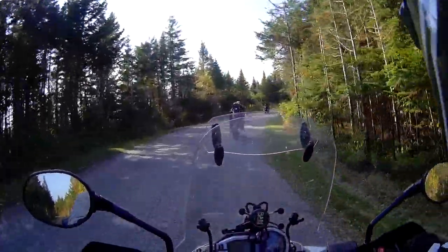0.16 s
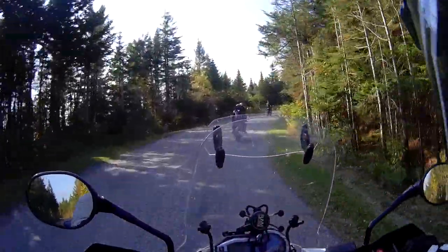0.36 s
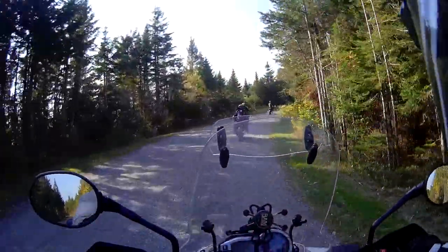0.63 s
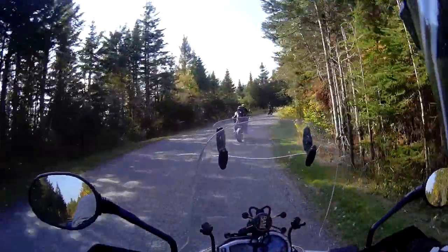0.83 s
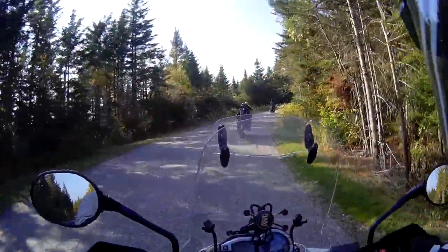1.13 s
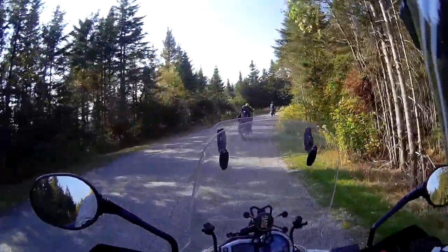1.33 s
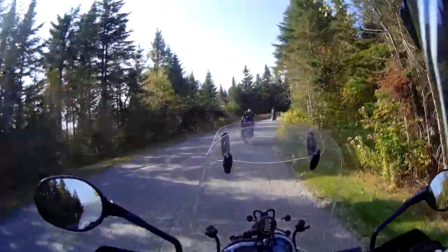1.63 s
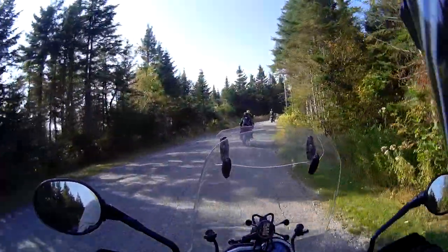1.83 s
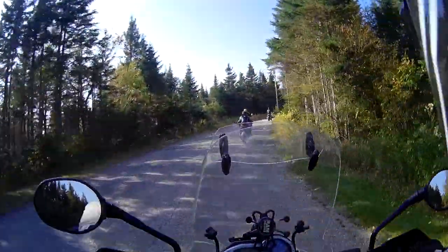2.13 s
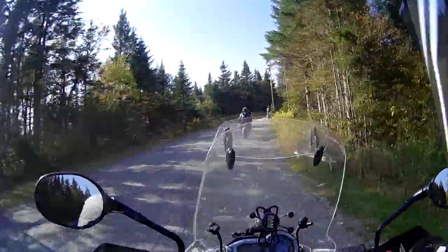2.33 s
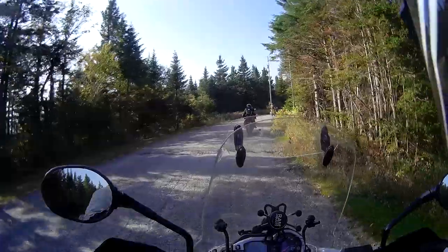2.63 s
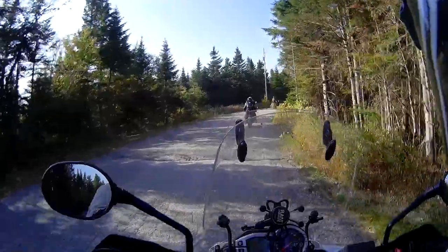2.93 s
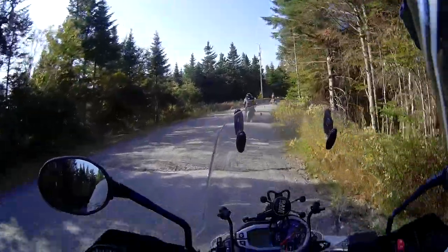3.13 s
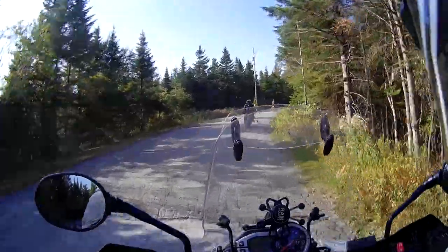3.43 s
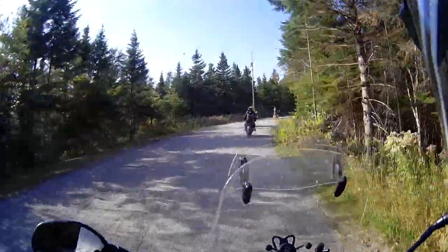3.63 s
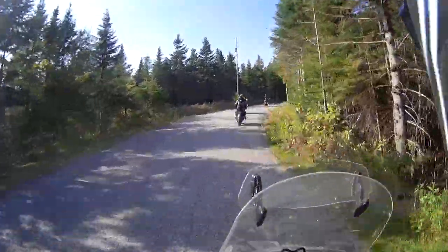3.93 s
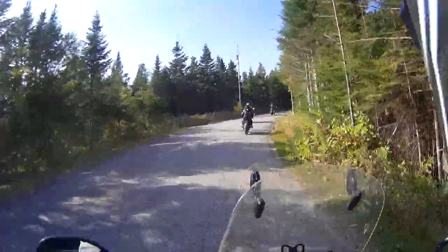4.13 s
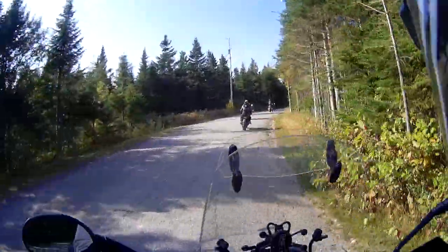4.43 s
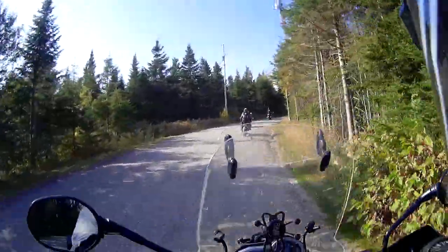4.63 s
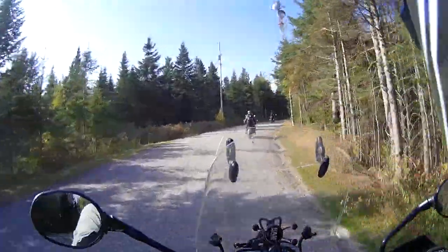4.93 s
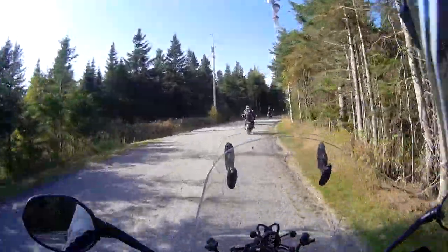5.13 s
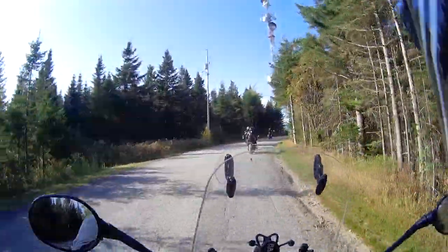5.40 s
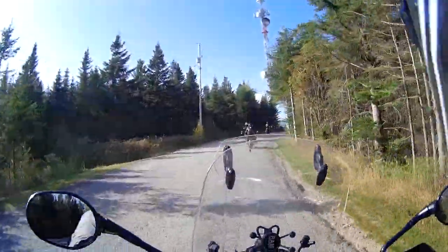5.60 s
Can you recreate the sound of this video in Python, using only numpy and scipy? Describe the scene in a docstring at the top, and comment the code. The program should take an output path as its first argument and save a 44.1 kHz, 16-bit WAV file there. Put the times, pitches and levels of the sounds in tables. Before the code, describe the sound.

A motorcycle travels along a forest road, heard from the rider's helmet. From the start there is a low exhaust hum with a thin, wavering gear whine, an intake growl and a light mechanical clatter, while a second motorcycle drones nearby at a slightly higher pitch. Road roar and airy hiss lie over both. At about 1.3 seconds all of this drops noticeably and stays lower, while wind keeps buffeting the microphone in irregular low gusts throughout. Three short, low thuds from bumps come at about 3.1, 3.5 and 4 seconds. Between 3.1 and 4.5 seconds the engine pitch rises a little, and from about 3.6 seconds a light, rapid valve tapping joins in. Brief high sizzles of air pass the helmet at around 3.7, 4 to 4.4 and 5.3 seconds. The engines run on steadily until nearly 6 seconds.

```python
"""A forest road, heard from the helmet of a rider on a three-cylinder motorcycle.
The exhaust hums, the primary gears whine and the cases clatter; a second engine drones nearby.
Road roar, intake growl and air hiss lie over them, and this whole bed sinks after the first second
while wind keeps buffeting the microphone. Past halfway, three bumps thud through the frame,
a valve taps under load, the head turns and air sizzles past an edge of the helmet."""
import sys
import numpy as np
from scipy import signal
from scipy.fft import rfft, irfft, next_fast_len
from scipy.io import wavfile
from scipy.ndimage import uniform_filter1d

SR = 44100
rng = np.random.default_rng(int(sys.argv[2]) if len(sys.argv) > 2 else 0)


def transcribe(u):
    """Save the signal u as a 16-bit wav file named by the first command-line argument.

    u: samples, shape (n,) or (channels, n), limited to [-1, 1]; the rate is SR.
    q: integer samples, one column per channel.
    """
    v = np.clip(np.atleast_2d(u).T, -1, 1)
    q = np.round(v * 32767).astype(np.int16)
    wavfile.write(sys.argv[1], SR, q)


N = 253998

# Fader for the bed; engine, road and hiss levels are relative to it: time_s, level_db
BED_FADER = [(0, -39), (1.23, -40), (1.28, -44), (1.42, -47), (1.48, -50.5), (1.72, -48.5), (1.91, -49.5),
             (1.97, -46), (2.2, -50), (2.52, -45.5), (2.72, -49.5), (2.9, -48.5), (3.03, -46),
             (3.33, -45.5), (3.41, -48), (3.48, -44.5), (3.72, -46), (3.87, -48.5), (4.0, -46),
             (4.07, -49.5), (4.12, -45.5), (4.42, -46), (4.52, -49), (4.75, -46), (4.92, -46.5),
             (5.12, -44), (5.5, -44.5), (5.57, -47.5), (5.76, -44.5)]
# The bike's engine speed: time_s, firing_hz
ENGINE_SPEED = [(0, 76.07), (.45, 75.8), (1.3, 72.72), (2.1, 72.06), (2.9, 71.76), (3.1, 72.07),
                (3.6, 75.4), (4.45, 83), (5.0, 83.3), (5.76, 82.4)]
# Balance shifting with load: time_s, exhaust_db, upper_partials_db, growl_send_db, clatter_send_db
ENGINE_LOAD = [(0, 6.6, 3, 4.7, -10), (1.3, 7.1, 2, 1.7, -11), (2.4, 8.4, 1, 3.8, -10.5),
               (2.9, 6.25, 3.5, 3.53, -9.5), (3.3, 3.1, 12, 4.6, -12), (3.7, 3, 9.5, 3.5, -9),
               (4.2, 2.8, 5, 5.1, -8.5), (4.55, 3.3, 6.5, 3, -10), (4.8, 8.55, -5, 1, -10.5),
               (5.3, 10.1, -6, 1.02, -9), (5.76, 9, -17, 1, -10.5)]
# Exhaust partials: firing_multiple, relative_db
EXHAUST_PARTIALS = [(1, 0), (2, -17), (3, -12.5), (4, -22), (5, -21.5), (16 / 3, -17.5), (6, -23),
                    (20 / 3, -20.5), (9, -26), (10, -27.5)]
# Pitches of the gear whine's tones, including a sideband below the main one: crank_multiple
WHINE_PITCHES = [51, 50, 29, 38.6]
# Balance of those tones within the whine: relative_db
WHINE_BALANCE = [-3, -12, -9, -13]
# Swells of the gear whine: time_s, whine_db, overtone_db, high_whine_db
WHINE_FADERS = [(0, -15, -28, -28), (.79, -13, -24, -23), (.83, -6.5, -24, -27), (1.1, -7, -24, -23),
                (1.24, -2, -27, -26), (1.29, -11, -26, -24), (1.55, -3.5, -22, -20), (2.12, -3.5, -20, -19),
                (2.2, -8, -21, -22), (2.47, -11, -25, -25), (2.53, 1.5, -22, -21), (2.65, -5.5, -22, -23),
                (3.02, -2.5, -23.5, -16.5), (3.15, -12, -23, -19), (3.27, -7, -21, -24),
                (3.42, -20, -27, -25), (3.55, -5, -28, -29), (3.65, -13, -26, -26), (4.07, -12.5, -20, -25),
                (4.14, -3, -14, -27), (4.4, -9.5, -17.5, -31), (4.7, -12, -20, -25), (5.0, -16, -17, -28),
                (5.1, -5.5, -16, -27), (5.33, -6, -18, -31), (5.38, -26, -21, -27), (5.76, -15, -21, -24)]
# The second engine's drone: time_s, firing_hz, octave_db, fundamental_db
DRONE_PATH = [(0, 101, 8.5, 2), (.75, 100.4, 8, 1.5), (1.2, 102.1, 8, 4.5), (1.7, 104.7, 7.5, 6.5),
              (2.1, 106.5, 6, 5.5), (2.9, 105.4, 7, 3), (3.3, 106.2, 4.5, 1.5), (3.84, 108, 1.5, -1),
              (4.3, 110.9, 1.5, 4.5), (4.6, 112.2, -1, -0.5), (4.85, 111.6, -1.5, 2.5),
              (5.05, 109.3, -1.5, 3.5), (5.5, 106.8, 0.5, 1), (5.76, 106, 2.5, -2.5)]
# Its upper partials, set against the fundamental: firing_multiple, relative_db
DRONE_PARTIALS = [(3, -11), (4, -8), (5, -19.5), (10, -23.5)]
# Colour of the road roar: frequency_hz, density_db
ROAR_COLOUR = [(50, 10.5), (120, -2), (500, -0.5), (620, -2.5), (1500, -2), (1950, -14.5), (2200, -17.5),
               (3000, -19), (4000, -32.5)]
# Hollow resonances in the roar: pitch_hz, width_hz, facing_ahead_db, head_turned_db
ROAR_MODES = [(1064, 26, -20, -7.5), (1295, 45, -14.5, -26), (1898, 68, -18, -15), (2505, 154, -12, -17),
              (2840, 150, -33, -15)]
# Colour of the intake growl: frequency_hz, density_db
GROWL_COLOUR = [(150, -0.5), (230, 1), (400, -5), (520, -5.5), (600, -18)]
# Colour of the engine's rattle: frequency_hz, density_db
RATTLE_COLOUR = [(2500, -15), (3300, 0), (6500, -5), (7500, -7.5), (9000, -28)]
# Ring of the cases and fairing: pitch_hz, width_hz, facing_ahead_db, head_turned_db
CASE_MODES = [(3736, 100, -12, -11), (4575, 77, -15.5, -9.5), (4970, 99, -15.5, -42), (5970, 300, -16, -15)]
# Colour of the air hiss: frequency_hz, density_db
HISS_COLOUR = [(6000, -22), (8200, -4), (10000, 1), (11500, -2), (13500, 1), (15500, -5)]
# Slow drift of the hiss: time_s, level_db
HISS_FADER = [(0, -15.5), (1.2, -15), (1.5, -13.5), (2.9, -14.5), (3.4, -16), (3.8, -13.5), (4.3, -12),
              (4.6, -14), (5.76, -13)]
# Colour of the wind on the microphone: frequency_hz, density_db
BUFFET_COLOUR = [(15, -1), (28, 1.5), (55, -9.5), (120, -13.5), (300, -30.5)]
# Gusts rising out of the steady wind: peak_s, boost_db
WIND_GUSTS = [(.17, 10), (.55, 5), (1.25, 5), (1.62, 6), (2.42, 10), (2.65, 10), (2.98, 8), (3.13, 11),
              (3.55, 7), (3.87, 12), (4.12, 9), (4.37, 6.5), (5.02, 8), (5.17, 6), (5.47, 7)]
# Thuds through the frame: start_s, pitch_hz, gain_db
FRAME_BUMPS = [(3.14, 62, -27), (3.51, 57.1, -29), (3.99, 74.5, -29)]
# The valve tap coming forward within the clatter: time_s, gain_db
VALVE_FADER = [(3.5, -30), (3.68, -10), (3.8, -15), (3.92, -11.5), (4.45, -9), (4.6, -14), (5.76, -14)]
# Ring of the tapping valve: pitch_hz, width_hz, gain_db
VALVE_MODES = [(2850, 130, 8.5), (5630, 67, 4), (5690, 45, 2.5)]
# Bursts of air past the helmet's edge: start_s, rise_s, hold_s, fall_s, level_db
SIZZLE_BURSTS = [(3.681, .08, .05, 0.039, -58), (3.99, .03, .04, .06, -56),
                 (4.095, 0.085, 0.15, 0.11, -54.5), (5.291, .015, 0.052, .2, -54.5)]
# Colour of those bursts: frequency_hz, density_db
SIZZLE_COLOUR = [(7500, -31), (9800, -9), (11500, -2), (13400, 1), (14500, -3), (15600, -10)]

HEAD_TURN_START_S, HEAD_TURN_END_S = 3.49, 4.66
TIME_S = np.arange(N) / SR


def undb(db):
    """Decibels to gain."""
    return 10 ** (np.asarray(db) / 20)


def curves(table):
    """A table's columns as straight-line automation over time."""
    times_s, *columns = np.transpose(table)
    return [np.interp(TIME_S, times_s, column) for column in columns]


def unit(x):
    """Scale to rms 1."""
    return x / np.sqrt(np.mean(x ** 2))


def waver(rate_hz):
    """A wandering control of rms 1: random steps, smoothed twice."""
    hold = int(SR / rate_hz)
    steps = np.repeat(rng.standard_normal(N // hold + 1), hold)
    return unit(uniform_filter1d(uniform_filter1d(steps, hold), hold)[:N])


def hump(peak_s, half_s):
    """A bell-shaped rise and fall."""
    return np.exp(-((TIME_S - peak_s) / half_s) ** 2)


def pulse(phase, depth, sharpness):
    """A gain that swells once each round of the phase."""
    return 1 + depth * np.exp(sharpness * (np.cos(phase) - 1))


def tone(phase, waver_db, slip_rad, rate_hz=12.5):
    """A partial near rms 1 whose level and phase waver."""
    level = np.sqrt(2) * undb(waver_db * waver(rate_hz))
    return level * np.sin(phase + slip_rad * waver(rate_hz) + 2 * np.pi * rng.random())


def noise(colour):
    """Noise of the given colour, rms 1."""
    hz, db = np.transpose(colour)
    size = next_fast_len(N)
    bin_hz = np.arange(1, size // 2 + 2) * SR / size
    gain = undb(np.interp(np.log(bin_hz), np.log(hz), db, left=-80, right=-80))
    return unit(irfft(rfft(rng.standard_normal(size)) * gain, size)[:N])


def ring(drive, hz, width_hz):
    """One driven resonance, rms 1."""
    return unit(signal.lfilter(*signal.iirpeak(hz, hz / width_hz, SR), drive))


def resonances(drive, modes, waver_db):
    """A bank of resonances whose balance shifts as the head turns."""
    turned = np.interp(TIME_S, [HEAD_TURN_START_S, HEAD_TURN_END_S], [0, 1])
    return sum(undb(ahead_db + (turned_db - ahead_db) * turned + waver_db * waver(6.6))
               * ring(drive, hz, width_hz) for hz, width_hz, ahead_db, turned_db in modes)


def exhaust_hum(firing, upper_db):
    """The firing cylinders hum in a stack of partials, less steady towards the top."""
    return sum(undb(db + (multiple > 3) * upper_db)
               * tone(multiple * firing, waver_db=1.03 * np.sqrt(multiple), slip_rad=0.18 * multiple)
               for multiple, db in EXHAUST_PARTIALS)


def gear_whine(firing, high_multiple=129):
    """The primary gears sing at multiples of the crank rate."""
    whine_db, overtone_db, high_db = curves(WHINE_FADERS)
    crank = firing * 2 / 3  # three firings to two turns
    # The crank speeds up and slows within a turn, putting sidebands around each whine.
    swing = 0.51 * np.sin(2 * crank) + 0.28 * np.sin(crank)
    throb = 1 + 0.15 * np.cos(crank)
    whine = sum(undb(db) * tone(multiple * crank + swing, waver_db=2.3, slip_rad=0.89, rate_hz=24)
                for multiple, db in zip(WHINE_PITCHES, WHINE_BALANCE))
    overtone = tone(2 * (WHINE_PITCHES[0] * crank + swing), waver_db=2, slip_rad=1.3, rate_hz=40)
    high = tone(high_multiple * crank + 2 * swing, waver_db=2, slip_rad=1.4, rate_hz=35)
    return throb * (undb(whine_db) * whine + undb(overtone_db) * overtone + undb(high_db) * high)


def second_engine(wobble_s=2.3, wobble_rate_hz=5.02, wobble_depth_hz=6.5):
    """A nearby engine drones on harmonics of its firing rate; its pitch wobbles once."""
    firing_hz, octave_db, fundamental_db = curves(DRONE_PATH)
    wobble = hump(wobble_s, half_s=0.1214) * np.cos(2 * np.pi * wobble_rate_hz * (TIME_S - wobble_s))
    firing = 2 * np.pi * np.cumsum(firing_hz - wobble_depth_hz * wobble) / SR
    upper = sum(undb(db) * tone(multiple * firing, waver_db=2.5, slip_rad=0.28 * multiple)
                for multiple, db in DRONE_PARTIALS)
    fundamental = tone(firing, waver_db=0.7, slip_rad=0.7)
    octave = tone(2 * firing, waver_db=1, slip_rad=0.52)
    return undb(fundamental_db) * (fundamental + upper) + undb(octave_db) * octave


def road_roar(firing):
    """Broad road noise with a hollow ring, pulsing lightly with the engine."""
    road = unit(noise(ROAR_COLOUR) * pulse(firing, depth=0.12, sharpness=3))
    return undb(0.5) * road + resonances(road, ROAR_MODES, waver_db=1)


def intake_growl(firing, send_db, trim_db=-2.5):
    """Low intake noise that swells on every firing."""
    level = undb(send_db + trim_db + 0.42 * waver(13))
    return level * unit(noise(GROWL_COLOUR) * pulse(firing, depth=0.63, sharpness=1))


def case_clatter(firing, cycle, send_db, trim_db=-2.5):
    """A rattle pulsed by cycle, crank and firing rings the cases; the valve tap rides on top."""
    level = undb(send_db + trim_db + 0.51 * waver(30))
    shake = pulse(cycle, depth=0.28, sharpness=0.84)
    shake *= pulse(2 * cycle, depth=0.34, sharpness=0.85)
    shake *= pulse(firing, depth=0.2, sharpness=1.2)
    rattle = unit(shake * noise(RATTLE_COLOUR))
    taps = valve_tap(cycle)
    return level * (undb(-0.5) * rattle + resonances(rattle, CASE_MODES, waver_db=2.7) + taps)


def air_hiss(cycle):
    """Bright rushing air that flutters faintly with the engine cycle."""
    level = undb(curves(HISS_FADER)[0] + 0.5 * waver(30))
    return level * unit(noise(HISS_COLOUR) * pulse(cycle, depth=0.14, sharpness=1.5))


def wind_buffet(steady_db=-46.5, waver_db=1.2):
    """Wind thumps low on the microphone, harder in gusts."""
    gusts_db = sum(boost_db * hump(peak_s, half_s=0.051) for peak_s, boost_db in WIND_GUSTS)
    return undb(steady_db + gusts_db + waver_db * waver(12)) * noise(BUFFET_COLOUR)


def frame_thuds(rise_s=0.01, t60_s=0.2):
    """Each bump sends a short, low ring through the frame."""
    thuds = np.zeros(N)
    for start_s, hz, db in FRAME_BUMPS:
        age_s = np.maximum(TIME_S - start_s, 0)
        envelope = (1 - np.exp(-age_s / rise_s)) * undb(db - 60 * age_s / t60_s)
        thuds += envelope * np.sin(2 * np.pi * hz * age_s)
    return thuds


def valve_tap(cycle, spread_db=1.8):
    """One valve strikes once a cycle: a ringing burst of noise, its force new each time."""
    cycle_index = (cycle / (2 * np.pi)).astype(int)
    force = undb(spread_db * rng.standard_normal(N // 100))[cycle_index]
    strikes = force * (pulse(cycle, depth=1, sharpness=3.1) - 1) * rng.standard_normal(N)
    ringing = sum(undb(db) * ring(strikes, hz, width_hz) for hz, width_hz, db in VALVE_MODES)
    return undb(curves(VALVE_FADER)[0]) * ringing


def helmet_sizzle():
    """Air catches an edge of the helmet in short bursts of high hiss."""
    envelope = sum(undb(db) * np.interp(TIME_S, np.cumsum(timing_s), [0, 1, 1, 0])
                   for *timing_s, db in SIZZLE_BURSTS)
    return envelope * undb(1.3 * waver(35)) * noise(SIZZLE_COLOUR)


def scene():
    """Mono mix: engines, road and hiss on one fader; buffet, sizzle and thuds outside it."""
    exhaust_db, upper_db, growl_db, clatter_db = curves(ENGINE_LOAD)
    firing = 2 * np.pi * np.cumsum(curves(ENGINE_SPEED)[0]) / SR  # phase, one round per firing
    cycle = firing / 3  # one round for all three cylinders
    engines = undb(exhaust_db) * exhaust_hum(firing, upper_db) + gear_whine(firing) + second_engine()
    grit = road_roar(firing) + intake_growl(firing, growl_db) + case_clatter(firing, cycle, clatter_db)
    rush = undb(0.27) * grit + air_hiss(cycle)
    quick_gusts = undb(0.73 * waver(30))
    bed = undb(curves(BED_FADER)[0]) * (engines + quick_gusts * rush)
    return (bed + wind_buffet() + helmet_sizzle() + frame_thuds())[None]


def record(dry):
    """A steep low-pass shaves off the very top."""
    cutoff_hz = 15660
    return signal.sosfilt(signal.ellip(10, 0.2, 75, cutoff_hz, fs=SR, output="sos"), dry)


dry = scene()
out = record(dry)
transcribe(out)
```